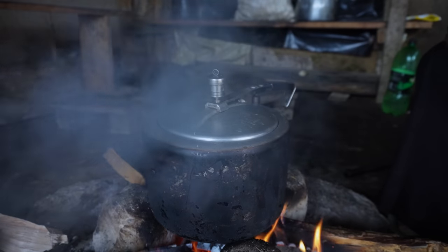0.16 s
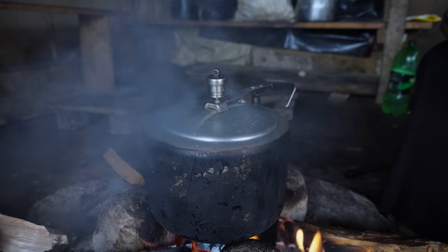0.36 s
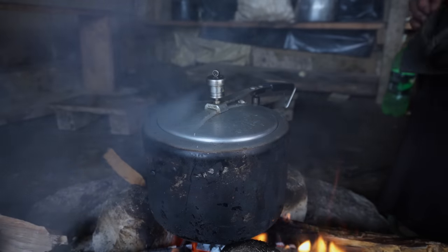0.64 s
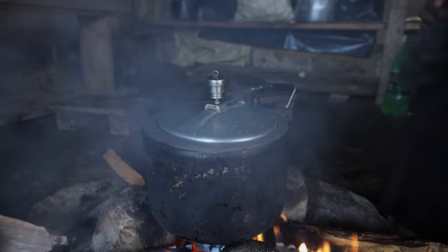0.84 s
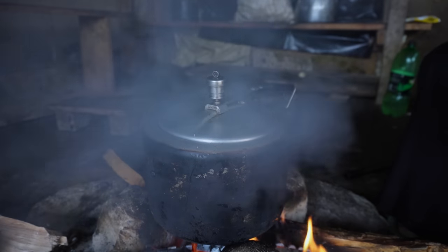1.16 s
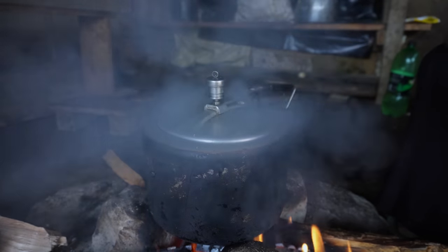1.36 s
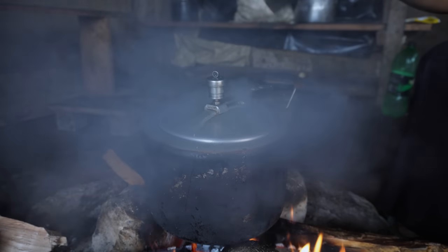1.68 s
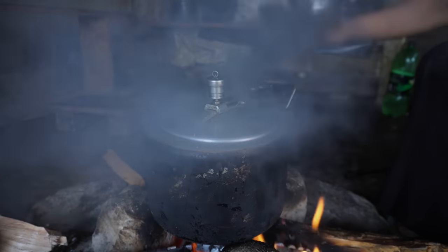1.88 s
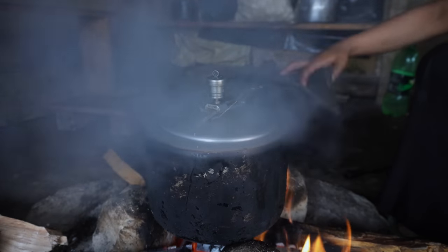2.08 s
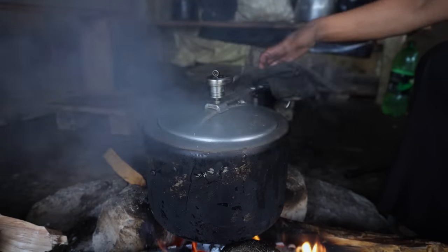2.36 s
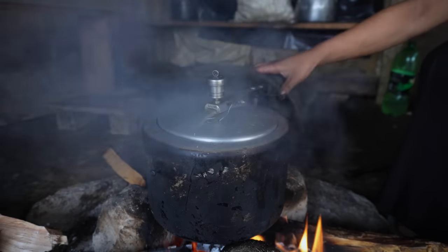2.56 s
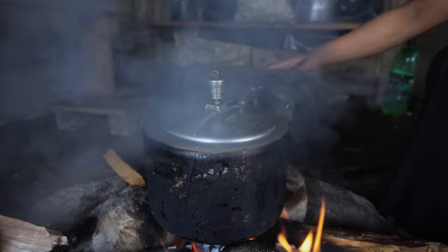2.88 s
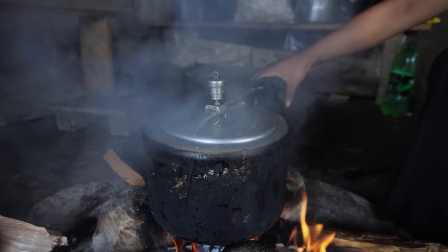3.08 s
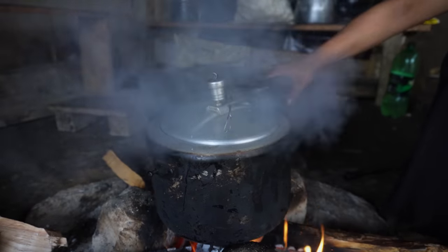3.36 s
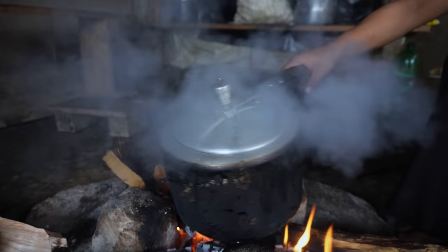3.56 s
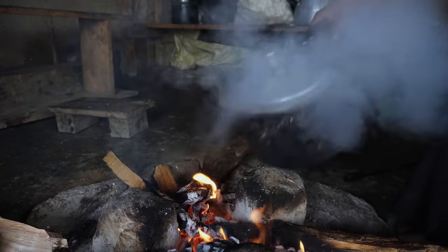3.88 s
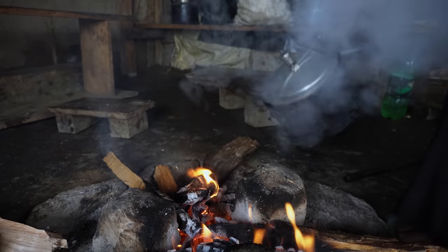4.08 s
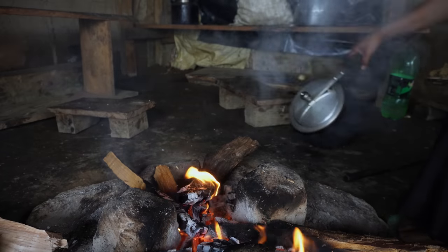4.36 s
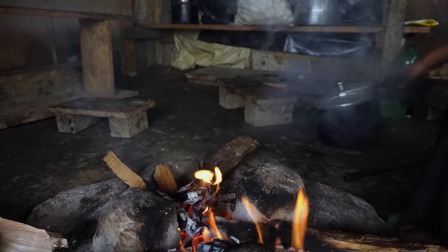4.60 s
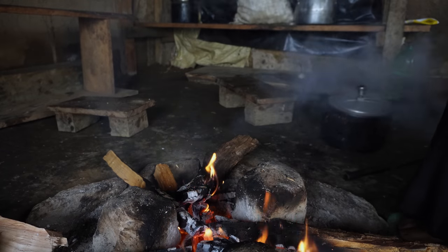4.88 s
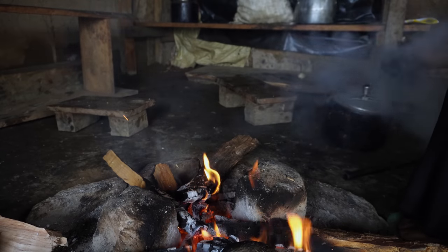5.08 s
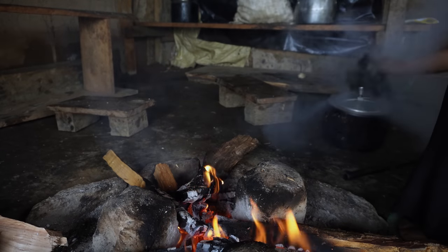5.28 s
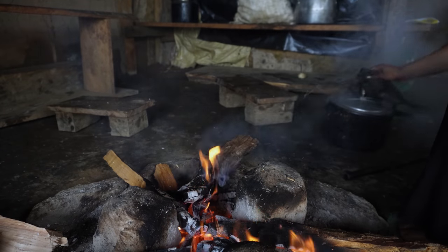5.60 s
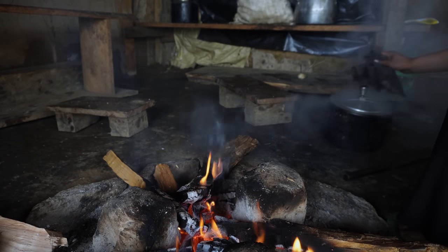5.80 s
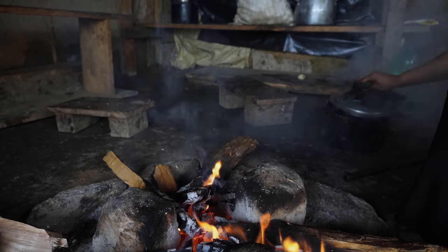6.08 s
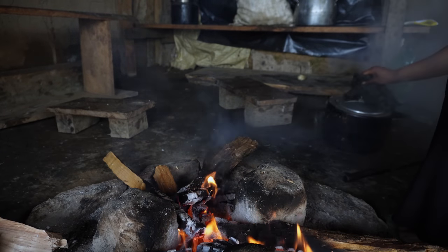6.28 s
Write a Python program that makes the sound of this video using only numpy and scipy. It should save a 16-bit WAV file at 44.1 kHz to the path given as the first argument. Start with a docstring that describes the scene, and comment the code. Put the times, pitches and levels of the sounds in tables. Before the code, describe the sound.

A pressure cooker in a small plank shed vents steam in a loud, continuous, bassless hiss, a metre or two from the stereo microphones. As the pot is lifted and swung aside, the hiss changes colour and a bright band sweeps through it. Late on, the valve weight clacks shut, leaving near silence with a tiny tick and puff; the jet bursts back, then clacks shut again with faint leaking puffs and ticks. Loud peaks crackle slightly with overload.

```python
"""In a small plank shed, a pressure cooker on a wood fire blows steam through its lid valve, a metre or two away.
A hand lifts the pot, swings it aside and sets it down further off: coloured noise whose level and tone follow the jet.
Twice the valve weight clacks shut (short ringing tones), leaks with small puffs and ticks, and lifts again.
The plank walls answer briefly, and the loudest peaks overload the microphone input, mostly on the left."""
import sys
import numpy as np
from scipy import signal
from scipy.io import wavfile
from scipy.ndimage import uniform_filter1d, map_coordinates

SR = 44100
rng = np.random.default_rng(int(sys.argv[2]) if len(sys.argv) > 2 else 0)


def waveform_to_disk(signal):
    """Save audio, clipped to [-1, 1], as 16-bit WAV at the path in sys.argv[1]."""
    frames = np.transpose(np.atleast_2d(signal))
    scaled = np.clip(frames, -1, 1) * 32767
    samples = np.round(scaled).astype(np.int16)
    wavfile.write(sys.argv[1], SR, samples)


N = 284180

# the jet as the pot is lifted, swung and set down: t/s, level/dB, topmost treble swell/dB, lower roar swell/dB
JET_LEVELS = [(0, -10.5, -1.5, 1.5), (0.79, -11, 1, 0), (1.04, -10.5, -2, -.5), (2.5, -10, -2.5, -1.5),
              (2.8, -11, 0, -1), (3.38, -10.5, -3, -.5), (3.59, -10.5, -0.5, 0), (3.72, -12, -7, -3),
              (3.9, -11.5, -7, -2.5), (3.96, -10.5, -2.5, -2.5), (4.19, -11.5, 0.5, 2),
              (4.34, -10.5, 1.5, -1), (4.48, -11, -1.5, 1), (4.51, -9, 0, 1), (4.55, -12, -3, -1),
              (4.58, -11, 0.5, 3), (4.9, -11.5, 0, 0.5), (5.37, -11.5, -1.5, -3), (5.64, -12.5, -2.5, 3),
              (5.8, -11.5, 0.5, -2), (6.07, -11.5, -1, 0)]
# how far the jet points at the microphones: t/s, share/0-1
JET_FACING = [(0, 1.), (3.3, 0.85), (3.7, 0.67), (3.95, 0.6), (4.15, 0.33), (5.9, 0.18), (6.07, 0.23)]
# the swinging lid mirrors one band of the jet at the microphones: t/s, centre f/Hz, lift/dB
LID_GLINT = [(4.05, 8000, -1), (4.24, 7260, 6), (4.3, 6960, 6), (4.36, 8200, 8), (4.42, 6300, 8.5),
             (4.47, 6000, -1), (4.5, 8000, 11.5), (4.55, 8000, 9), (4.59, 9500, 5), (4.7, 9500, 0)]
# colour of the jet from in front: f/Hz, level/dB per Hz
FRONT_COLOUR = [(320, -77), (550, -37.5), (780, -29.5), (936, -34), (1140, -21), (1660, -13.5),
                (2290, -11.5), (2640, -8.5), (4130, -4), (5620, -7.5), (6110, -9.5), (6830, -9.5),
                (10800, -1), (13000, -9), (15600, -16)]
# colour of the jet from the side: f/Hz, level/dB per Hz
SIDE_COLOUR = [(320, -60), (550, -42), (1030, -26.5), (1390, -17.5), (2020, -8.5), (2290, -8.5), (2870, -4),
               (3590, -3.5), (4430, 0), (6830, -2.5), (7640, -3), (11200, -5.5), (15600, -10)]
# colour of the leak past the shut weight: f/Hz, level/dB per Hz
LEAK_COLOUR = [(180, -59), (300, -33), (709, -21.5), (1490, -17), (1850, -9.5), (2290, -12), (2840, -7),
               (3410, -8), (5600, -9.5), (6610, -10), (7180, -9), (7790, -14), (9050, -14), (15600, -25)]
# the weight knocks the lid: clacks with a bounce as it shuts, one faint knock as it is pushed up:
# t/s, peak level before the bass cut/dB
WEIGHT_KNOCKS = [(5.4048, -1.5), (5.4099, 4), (5.632, -18.5), (6.0772, -3), (6.0809, 3.5), (6.085, -0.5)]
# what the lid rings with, before small random changes: f/Hz, relative level/dB, time to fall 60 dB/s
LID_MODES = [(1130, -1, 0.0069), (1580, -2.5, 0.01), (2110, 8.5, 0.006), (2540, -1, 0.013),
             (3380, -1, 0.0097), (4830, 1, .006)]
# small ticks while the valve is shut: t/s, level/dB, f/Hz, sharp edge/0-1
SMALL_TICKS = [(5.541, -30, 2200, .03), (6.257, -39, 4000, .2), (6.3065, -26.5, 3900, 0.6),
               (6.399, -21, 2460, 0.3), (6.411, -21, 2950, .2)]
# the two microphone ports, full effect in the treble: f/Hz, left minus right/dB with the jet facing, then aside,
# unrelated share/0-1 with the jet facing, then aside
MIC_PORTS = [(4380, 3, 0, 0.02, 0.31), (5800, 0.5, 0.5, 0.32, 0.38), (6900, 2, 0, 0.4, 0.4),
             (7900, 6, 0, 0.34, 0.5), (9900, 2, 3, 0.05, 0.39), (12000, 3, 5., 0, 0.54),
             (13000, 4.5, 4, 0.33, 0.49), (15500, 13, 13, 0.52, 0.44)]
# the weight drops onto the valve and is later pushed fully up: shuts t/s, opens t/s, steady seep level/dB
VALVE_SHUT = [(5.409, 5.628, -62), (6.085, 6.448, -49)]
# puffs that escape past the shut weight: middle t/s, length/s, level/dB, breathy whistle/dB
LEAK_PUFFS = [(5.574, 0.024, -46, -5), (6.206, 0.084, -50, 12), (6.352, 0.048, -39.5, -2),
              (6.395, .05, -41, 0)]

FRAME = 512  # samples in each short slice of sound
GLINT_OCTAVES = 0.26
SHADE_PER_LIFT = 0.28  # the band above the glint dims by this share of its lift
# with the pot aside, the nearest surface sends the jet once more, a little late, and combs its colour
MIRROR_LAG_MS, MIRROR_SHARE = 1.3, 0.082
CHOKE_S, CHOKE_DB = 0.03, 7.5  # the roar thickens briefly around each shutting, most as the weight lands
SHUT_DB, DRAIN_DB_PER_S = -28.5, 233
OPEN_DB, LIFT_DB_PER_S = -11.5, 647
SPUTTER_DB, JET_FLUTTER_DB = 1.5, 0.46  # typical size of the fast level wobble
WHISTLE_HZ, WHISTLE_WIDTH_HZ = 2870, 250
SHED_T60_S, SHED_TREBLE_T60_S = 0.13, 0.095  # time for the echoes to fall 60 dB
SHED_DB, KNOCK_ECHO_DB, TICK_ECHO_DB = -3, -1, -7
PORT_LAG_S = 6e-6
LOW_CUT_HZ, TOP_HZ = 740, 15700
MURMUR_DB, LEFT_BEND = -71, 0.088


def steam():
    """Direct hiss and two unrelated echo fields: drifting vapour reshuffles the echoes, so they never comb."""
    t = np.arange(N) / SR
    hz, s, _ = to_frames(t)
    hz = np.maximum(hz, 20)
    jet_gain = undb(jet_colour(hz, s))
    leak_gain = undb(leak_colour(hz, s))
    jet, sputter = steam_levels(t)

    fields = []
    for _ in range(2):
        low, high = split(hiss(jet_gain))
        low_echo = low * np.sqrt(linger(jet, SHED_T60_S))
        high_echo = high * np.sqrt(linger(jet, SHED_TREBLE_T60_S))
        fields.append(low_echo + high_echo + sputter * hiss(leak_gain))
    direct = np.sqrt(jet) * hiss(jet_gain) + sputter * hiss(leak_gain)
    return direct, *fields


def steam_levels(t):
    """Power of the jet and strength of the leak as the weight shuts and frees the valve."""
    shut, leak_db = leak_level(t)
    flutter = np.repeat(walk(30, lanes=2, steps_per_s=SR / 20), 20, axis=1)[:, :N]
    leak = (shut * undb(leak_db + SPUTTER_DB * flutter[1])) ** 2
    open_jet = ((1 - shut) * undb(column(JET_LEVELS, t) + JET_FLUTTER_DB * flutter[0])) ** 2
    # the wider the gap under the weight, the more the leak takes the colour of the jet
    wide = np.clip((leak_db + 34) / 18, 0, 1)
    return open_jet + wide * leak, np.sqrt((1 - wide) * leak)


def jet_colour(hz, s):
    """Front and side colour in dB, mixed by the jet's direction, then changed by reflections and eddies."""
    facing = facing_share(s)
    db = np.outer(column(FRONT_COLOUR, hz, warp=np.log), facing)
    db += np.outer(column(SIDE_COLOUR, hz, warp=np.log), 1 - facing)
    return db + glint(hz, s) + mirror(hz, facing) + swells(hz, s) + eddies(hz, s)


def glint(hz, s):
    """The swinging lid mirrors one band and dims a band above it, in dB."""
    away = np.log2(hz[:, None] / column(LID_GLINT, s)) / GLINT_OCTAVES
    bright = np.exp(-away ** 2 / 2)
    shade = np.exp(-(away - 2.6) ** 2 / 2)
    return (bright - SHADE_PER_LIFT * shade) * column(LID_GLINT, s, index=2)


def mirror(hz, facing):
    """A late copy off the nearest surface strengthens some pitches and weakens others, in dB."""
    late = np.exp(2j * np.pi * hz / 1000 * MIRROR_LAG_MS)
    return 20 * np.log10(np.abs(1 + MIRROR_SHARE * np.outer(late, 1 - facing)))


def swells(hz, s):
    """Topmost treble and lower roar leave the jet at other angles, so they swell on their own, in dB."""
    top_db = column(JET_LEVELS, s, index=2)
    roar_db = column(JET_LEVELS, s, index=3)
    for shuts, _, _ in VALVE_SHUT:
        roar_db += CHOKE_DB * np.clip(1 - np.abs(shuts - s) / CHOKE_S, 0, 1)
    top = np.clip((hz - 11800) / 1000, 0, 1)
    roar = np.clip((5800 - hz) / 1200, 0, 1)
    return np.outer(top, top_db) + np.outer(roar, roar_db)


def eddies(hz, s):
    """Eddies let neighbouring bands wander together; standing waves between walls add fine, slow ripples, in dB."""
    rate = 1 / (s[1] - s[0])
    slow = walk(1.9, lanes=11, steps_per_s=rate)
    fast = walk(22, lanes=11, steps_per_s=rate)
    lane = np.clip(2 * np.log2(hz / 500), 0, 10)  # two lanes per octave
    places = np.meshgrid(lane, np.arange(len(s)), indexing="ij")
    wander = map_coordinates(0.29 * slow + 1.02 * fast, places, order=1)
    ripple = walk(1.52, lanes=len(hz), steps_per_s=rate)[:, :len(s)]
    return wander + 2.06 * ripple


def leak_colour(hz, s):
    """Colour of the leak in dB, with a narrow breathy band that each puff raises or lowers."""
    whistle_db = sum(db * bump(s, middle, length) for middle, length, _, db in LEAK_PUFFS)
    band = np.exp(-((hz - WHISTLE_HZ) / WHISTLE_WIDTH_HZ) ** 2 / 2)
    return column(LEAK_COLOUR, hz, warp=np.log)[:, None] + np.outer(band, whistle_db)


def leak_level(t):
    """The gap drains, seeps, puffs, then opens at a steady pace; gives shut (0-1) and leak level in dB."""
    shut = np.zeros(len(t))
    power = sum(undb(2 * db) * bump(t, middle, length) for middle, length, db, _ in LEAK_PUFFS)
    for shuts, opens, seep_db in VALVE_SHUT:
        inside = (t > shuts) & (t <= opens)
        drain_db = SHUT_DB - DRAIN_DB_PER_S * np.abs(t - shuts)
        lift_db = OPEN_DB - LIFT_DB_PER_S * np.abs(opens - t)
        # twice the dB turns a gain into a power
        power = power + undb(2 * drain_db) + undb(2 * lift_db) + inside * undb(2 * seep_db)
        shut += inside
    return uniform_filter1d(shut, size=60), 10 * np.log10(power + 1e-12)


def lid():
    """Each knock of the weight rings the lid's tones with new strengths and slightly new pitches."""
    out = np.zeros(N)
    t = np.arange(int(0.15 * SR)) / SR
    chance = rng.standard_normal((len(WEIGHT_KNOCKS), len(LID_MODES), 2))
    for (s, peak_db), draw in zip(WEIGHT_KNOCKS, chance):
        ring = np.zeros(len(t))
        for (hz, db, t60), (strength, pitch) in zip(LID_MODES, draw):
            fade = np.exp(-np.log(1000) * t / t60)
            tone = np.sin(2 * np.pi * hz * (1 + 0.05 * pitch) * t)
            ring += undb(db + 2 * strength) * fade * tone
        i = int(s * SR)
        out[i:i + len(t)] += undb(peak_db) * ring / np.abs(ring).max()
    # the small lid radiates next to no bass
    return signal.sosfilt(signal.butter(6, 900, "high", fs=SR, output="sos"), out)


def ticks():
    """Dry ticks: a sharp noise edge on a tone that dies within a few cycles."""
    out = np.zeros(N)
    t = np.arange(int(0.0079 * SR)) / SR
    chance = rng.standard_normal((len(SMALL_TICKS), len(t)))
    for (s, level_db, hz, edge), noise in zip(SMALL_TICKS, chance):
        ring = np.exp(-t * hz / 1.7) * np.sin(2 * np.pi * hz * t)
        snap = edge * noise * np.exp(-t / 0.00045)
        i = int(s * SR)
        out[i:i + len(t)] += undb(level_db) * (ring + snap)
    return out


def shed(x):
    """Dense plank-wall echoes of a knock, power kept; they need a moment to return, the treble dies first."""
    t = np.arange(int(0.3 * SR)) / SR
    low, high = split(rng.standard_normal(len(t)))
    echo = low * undb(-60 * t / SHED_T60_S) + high * undb(-60 * t / SHED_TREBLE_T60_S)
    echo *= np.clip(t / 0.0063, 0, 1)
    return signal.fftconvolve(x, echo / np.sqrt(np.sum(echo ** 2)))[:N]


def linger(power, t60_s):
    """Power that dies away 60 dB in t60_s after its source stops."""
    keep = undb(-120 / (t60_s * SR))
    return signal.lfilter([1 - keep], [1, -keep], power, zi=[keep * power[0]])[0]


def split(x):
    """Below and above the pitch where the walls start to soak up sound."""
    low = signal.sosfiltfilt(signal.butter(2, 5000, fs=SR, output="sos"), x)
    return low, x - low


def hiss(gain):
    """Noise of average strength near 1, coloured anew in each short frame."""
    frames = to_frames(rng.standard_normal(N))[2]
    return from_frames(frames * gain / np.sqrt(np.mean(gain ** 2, axis=0)))


def walk(rate, lanes, steps_per_s):
    """Random levels that drift about rate times a second, one row per lane; spread 1."""
    width = max(int(steps_per_s / rate), 1)
    steps = int(N / SR * steps_per_s) + 4
    noise = rng.standard_normal((lanes, steps))
    drift = uniform_filter1d(uniform_filter1d(noise, width), width)
    return drift / drift.std()


def bump(t, middle_s, length_s):
    """A soft swell, 1 in its middle."""
    return np.exp(-(2 * (t - middle_s) / length_s) ** 4)


def facing_share(s):
    """How far the jet points at the microphones, 0 to 1."""
    return np.clip(column(JET_FACING, s), 0, 1)


def column(table, at, index=1, warp=np.asarray):
    """One column of a table, read between its rows."""
    rows = np.array(table, float)
    return np.interp(warp(at), warp(rows[:, 0]), rows[:, index])


def undb(db):
    """Gain of a level in dB."""
    return 10 ** (np.asarray(db) / 20)


def to_frames(x):
    """Pitches in Hz, frame times in s, and the sound split into both."""
    return signal.stft(x, SR, nperseg=FRAME)


def from_frames(frames):
    """Sound put together again from its frames."""
    return signal.istft(frames, SR, nperseg=FRAME)[1][..., :N]


def scene():
    """Both ports hear nearly the same bass; in the treble they differ more in level and echoes, and slightly in time."""
    direct, echoes, other_echoes = steam()
    knock, tick = lid(), ticks()
    wet = undb(SHED_DB)
    blow = (direct + wet * echoes) / np.sqrt(1 + wet ** 2)
    hits = knock + tick + shed(undb(KNOCK_ECHO_DB) * knock + undb(TICK_ECHO_DB) * tick)
    hz, s, mid = to_frames(blow + hits)
    side = to_frames(other_echoes + shed(knock))[2]

    facing = facing_share(s)
    # waves much longer than the body that holds the microphones reach both ports nearly alike
    short = np.clip((hz - 2900) / 1500, 0.1, 1)
    near_db, far_db, near, far = (short * column(MIC_PORTS, hz, index=k) for k in range(1, 5))
    # half the level difference goes to each port
    balance = undb((np.outer(near_db, facing) + np.outer(far_db, 1 - facing)) / 2)
    share = np.outer(near, facing) + np.outer(far, 1 - facing)
    lag = np.exp(-2j * np.pi * hz * PORT_LAG_S)[:, None]
    left = balance * (mid + share * side)
    right = (mid - share * side) / balance * lag
    return from_frames(np.array([left, right]))


def record(dry):
    """A steep wind filter leaves a faint murmur in the bass; overload sprinkles crackle back in; the top is cut."""
    thin = signal.sosfilt(signal.butter(6, LOW_CUT_HZ, "high", fs=SR, output="sos"), dry)
    murmur_band = signal.butter(1, [300, 900], "band", fs=SR, output="sos")
    murmur = signal.sosfilt(murmur_band, rng.standard_normal(dry.shape))
    clipped = np.clip(thin + undb(MURMUR_DB) * murmur / murmur.std(), -1.03, 1.03)
    # the hotter left input already bends below full scale
    bent = clipped - np.array([[LEFT_BEND], [0]]) * clipped ** 3
    return signal.sosfilt(signal.ellip(10, 0.2, 70, TOP_HZ, fs=SR, output="sos"), bent)


dry = scene()
out = record(dry)
waveform_to_disk(out)
```